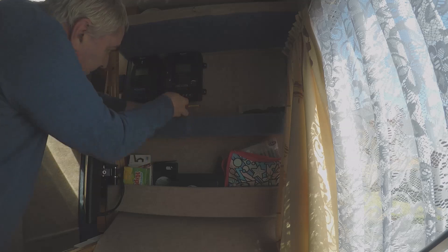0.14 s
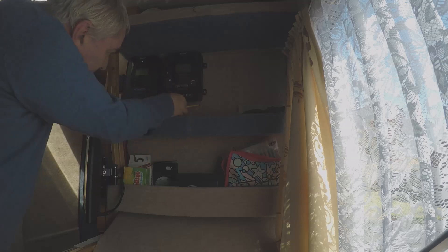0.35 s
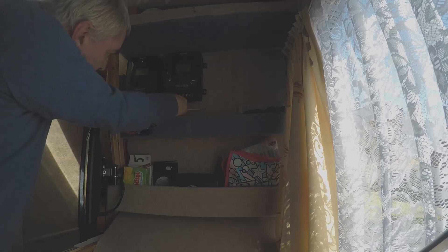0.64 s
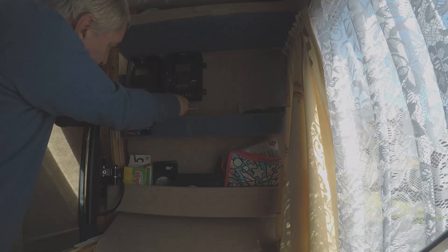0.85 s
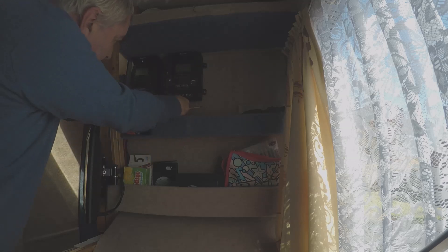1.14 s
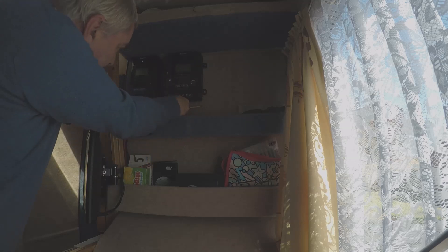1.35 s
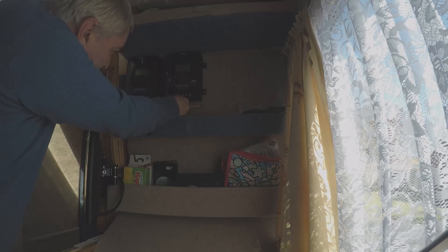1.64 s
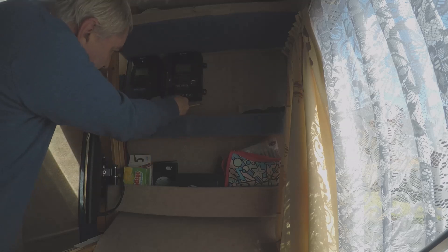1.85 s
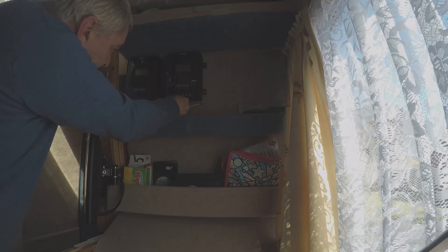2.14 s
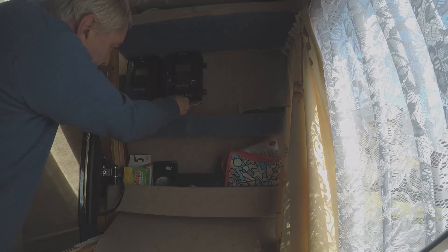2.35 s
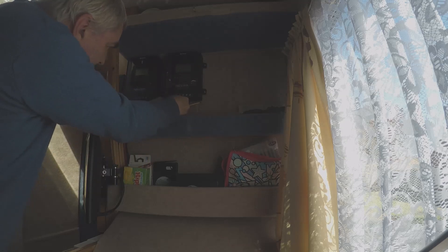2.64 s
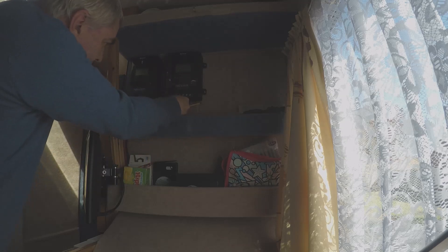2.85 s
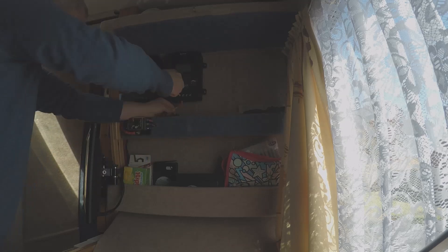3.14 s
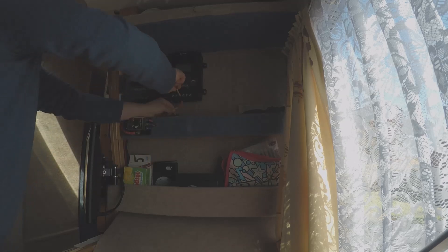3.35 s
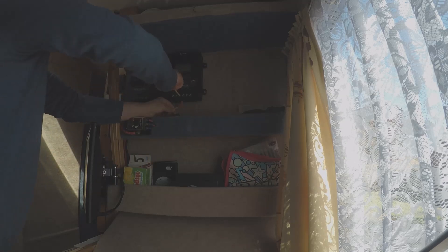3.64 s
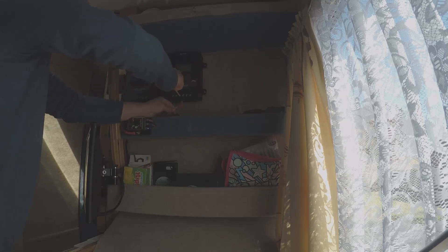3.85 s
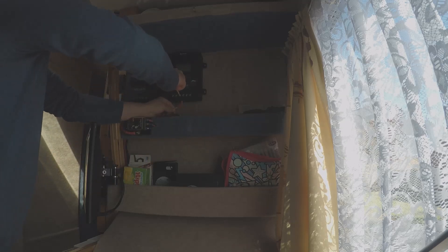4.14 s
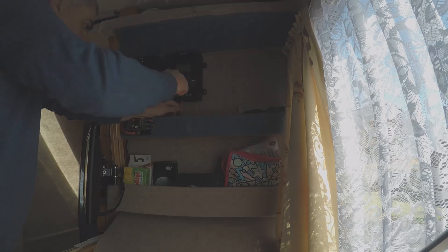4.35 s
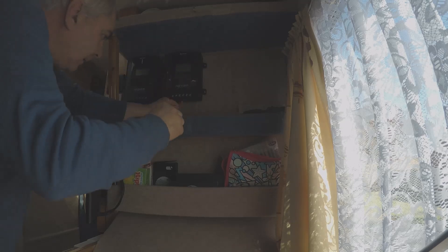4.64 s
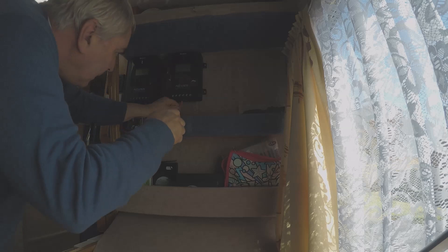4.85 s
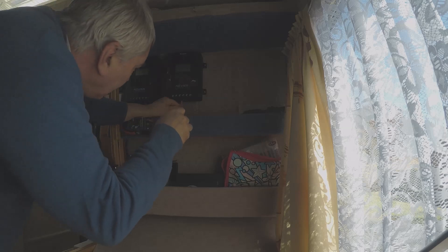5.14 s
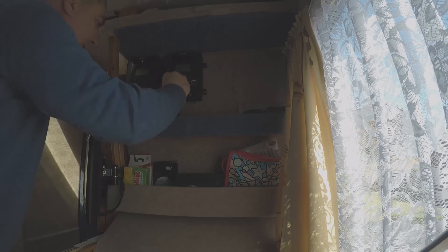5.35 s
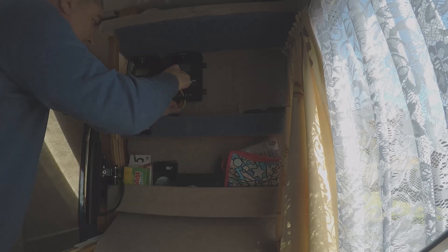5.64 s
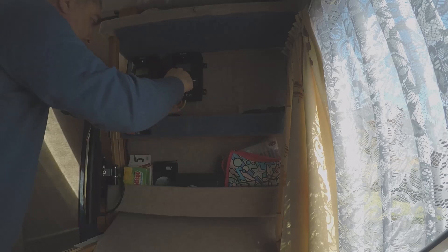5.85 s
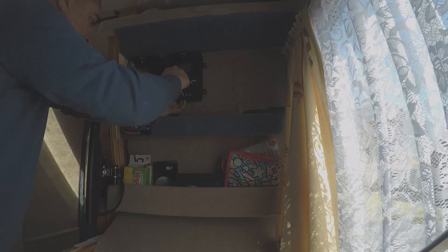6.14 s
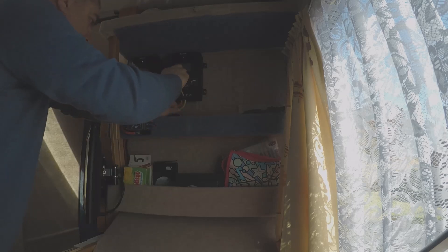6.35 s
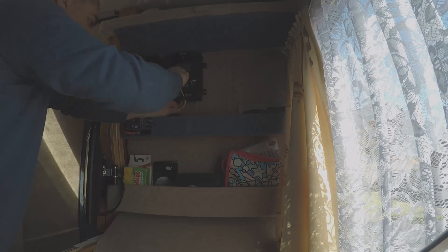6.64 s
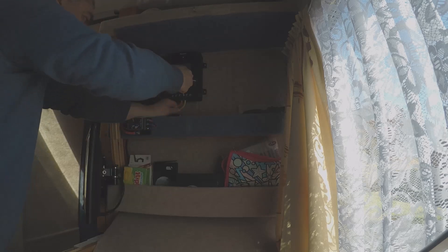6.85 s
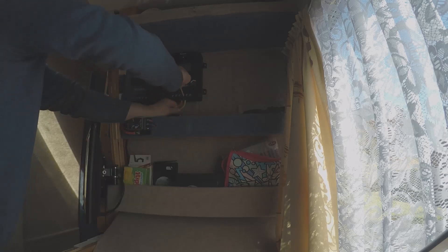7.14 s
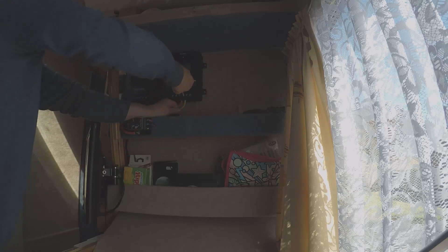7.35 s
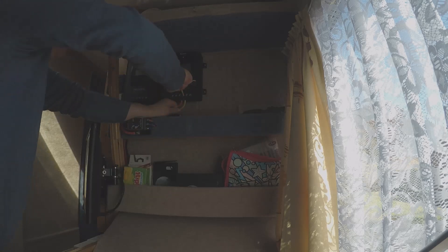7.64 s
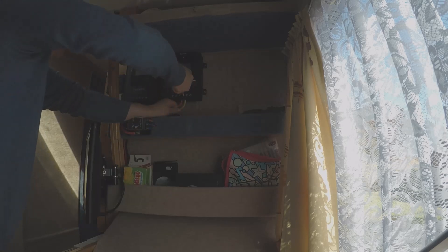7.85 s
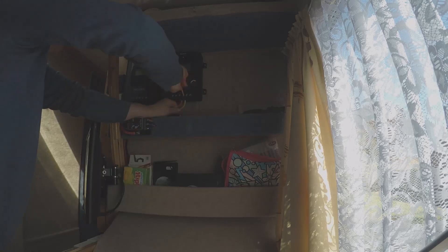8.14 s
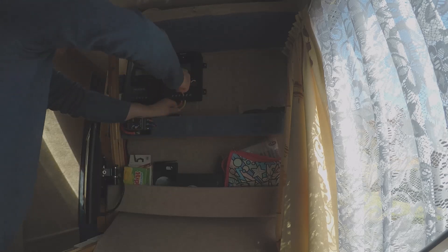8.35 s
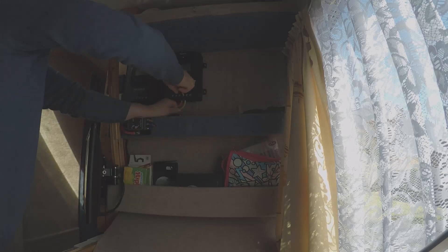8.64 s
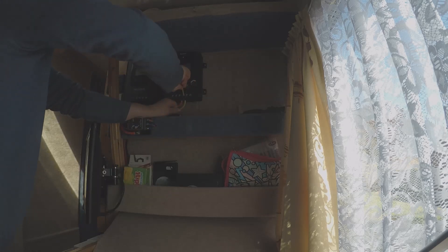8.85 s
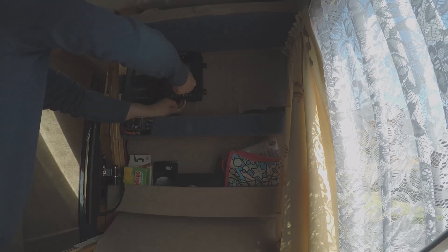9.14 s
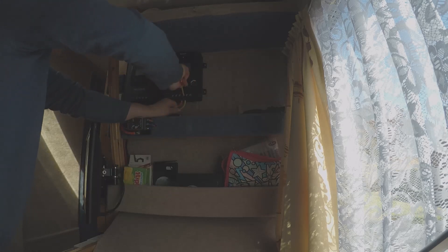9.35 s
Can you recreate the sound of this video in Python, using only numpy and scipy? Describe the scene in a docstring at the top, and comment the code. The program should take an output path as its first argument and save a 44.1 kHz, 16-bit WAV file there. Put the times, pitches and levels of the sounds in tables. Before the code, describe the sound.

Irregular screwdriver clicks and knocks on wall terminals in a van, with sleeve rustle and dull thumps over a low rumble.

```python
"""Wiring work in a parked van.

A screwdriver strikes and drags on terminals: the steel blade snaps, the housing clacks, the panel knocks.
Wires rasp over the housing, sleeves rub, and shifting weight thumps, judders and rocks the body.
The small upholstered cabin damps each sound at once, over a steady rumble and hiss."""
import sys
import numpy as np
from scipy import signal
from scipy.fft import rfft, irfft, next_fast_len
from scipy.io import wavfile

SR = 44100
rng = np.random.default_rng(int(sys.argv[2]) if len(sys.argv) > 2 else 0)


def persist_wave(psi):
    """Save psi, clipped to +-1, as 16-bit WAV."""
    counts = np.round(np.clip(psi, -1, 1) * 32767).astype(np.int16)
    wavfile.write(sys.argv[1], SR, np.atleast_2d(counts).T)


N = 419391

# rocking of the van: time_s, level_db
SWAY_LEVELS = [(0, -33), (.6, -20), (2.2, -20), (2.85, -17.5), (3.4, -23.5), (6.5, -26.5), (9.5, -24.5)]
# its pressure swings: freq_hz, gain_db
SWAY_SPECTRUM = [(5, -1), (14, 11.5), (30, -4), (150, -66)]
# steady rumble and hiss: freq_hz, gain_db
HISS_SPECTRUM = [(30, -39.5), (56, 3.5), (130, -8.5), (250, -22), (1000, -24), (4000, -30.5), (15000, -38)]
# sleeve slides: start_s, length_s, rub_db, swish_db
SLEEVE_STROKES = [(0.261, 0.104, -32, -47.5), (0.448, 0.064, -37, -50), (0.623, .14, -37, -42.5),
                  (1.037, 0.155, -32, -43.5), (1.448, 0.088, -37.5, -43), (1.706, 0.056, -32, -45),
                  (2.481, 0.034, -29.5, -56), (3.961, 0.0844, -34.5, -72.5)]
# dull cloth rub: freq_hz, gain_db
RUB_SPECTRUM = [(50, 7.5), (130, 12.5), (500, -3.5), (1450, -12), (2200, -18.5), (14000, -39)]
# bright cloth swish: freq_hz, gain_db
SWISH_SPECTRUM = [(500, 14.5), (1300, 10.5), (2200, -2.5), (4600, 0.5), (4800, 6), (5000, -6.5),
                  (14000, -16)]
# wire pulled along the housing: start_s, length_s, attack_s, level_db
WIRE_PULLS = [(0.18, 0.0556, 0.0028, -39), (0.261, 0.091, 0.0031, -36.5), (2.854, 0.1332, 0.037, -37),
              (2.982, 0.024, 0.0108, -33)]
# wire rasp: freq_hz, gain_db
WIRE_SPECTRUM = [(400, 6), (1400, 2.5), (2000, -4.5), (9000, -9.5), (10500, -17), (15000, -23)]
# feet and arms bump floor and furniture: start_s, peak_db, centre_hz
BUMPS = [(.182, -14, 161.6), (0.221, -17, 240), (.271, -7, 83.8), (1.539, -19, 223), (1.749, -20, 85.6),
         (2.52, -14.5, 114.2), (2.805, -12.5, 85.8), (3.146, -15, 88), (3.278, -21.5, 126),
         (3.458, -21, 171.3), (3.647, -24, 139), (4.053, -24, 163.6), (4.25, -21.5, 100.6),
         (5.263, -21.5, 119), (5.319, -14, 253), (5.33, -19, 75), (7.655, -23, 129), (8.764, -16.5, 140.3)]
# floor and cabin air: pitch_hz, t60_s, gain_db
BODY_MODES = [(46.14, 1, -2), (69.06, 0.52, 3.5), (87.53, 0.42, -4.5), (115.92, 0.381, -2),
              (139, 0.2067, 1.5), (194.46, 0.0883, 1.5), (223.2, 0.1764, -0.5)]
# tool nudges or grates on the panel: start_s, drag_s, knock_db, clack_db
TOOL_SCRAPES = [(.183, 0.0092, -39, -33), (.808, .004, -44.5, -41), (1.167, 0.0089, -38.5, -35.5),
                (1.362, 0.02806, -26.5, -32), (1.576, 0.00865, -39, -44), (1.836, 0.0188, -32, -39.5),
                (2.186, .006, -40.5, -44.5), (3.255, .008, -36, -44), (3.276, .018, -29, -45),
                (3.355, 0.01, -33, -44.5), (3.424, 0.0044, -43, -51.5), (3.459, 0.0045, -38, -48),
                (4.261, 0.00545, -29, -40), (5.47, 0.0527, -34.5, -35), (5.788, 0.0219, -30, -34.5),
                (6.408, 0.0195, -33.5, -37.5), (6.648, .011, -33.5, -35), (7.387, 0.0574, -31.5, -40.5),
                (8.008, 0.0192, -27, -35), (8.043, 0.01183, -28.5, -45.5), (8.108, 0.00814, -28.5, -36.5),
                (8.176, 0.00186, -31.5, -42.5), (8.232, 0.00727, -30.5, -32), (8.591, 0.0046, -38, -38.5),
                (8.624, .014, -22.5, -33), (8.657, 0.0081, -32.5, -55), (9.352, .008, -41, -37.5),
                (9.374, 0.01377, -29.5, -35.5)]
# tip strikes a terminal: start_s, drag_s, knock_db, clack_db, tick_db, snap_db, pitch_hz
TOOL_TAPS = [(1.1241, 0.0016, -30.5, -28.5, -26, -42, 3040), (1.5405, 0, -32, -30, -35, -48.5, 908.6),
             (1.641, .008, -38.5, -39, -47, -62.5, 840), (2.798, 0.0027, -40.5, -35, -48.5, -42, 998),
             (3.145, 0.0041, -58.5, -40.5, -45.5, -49.5, 1318), (4.2305, .005, -39, -29, -27, -38.5, 3950),
             (4.2395, .003, -31, -26, -27.5, -41.5, 982), (5.313, .007, -25, -22.5, -34.5, -39.5, 1450),
             (5.323, 0.0098, -20, -22, -33.5, -45.5, 1400), (5.682, 0, -45.5, -40.5, -37, -51.5, 3454),
             (5.773, .007, -43.5, -35, -37.5, -48, 3350), (5.8737, 0.0052, -22, -21, -35.5, -43, 978),
             (5.929, 0.0057, -38.5, -35.5, -31, -49.5, 2500), (6.0895, .004, -45, -32, -28.5, -44, 4530),
             (6.124, .01, -28.5, -27.5, -35.5, -58.5, 1260), (6.37, 0.0069, -39.5, -47.5, -38, -53, 3395),
             (6.5315, 0.00235, -22.5, -20, -30.5, -50, 793.4),
             (6.7774, 0.0064, -26.5, -23.5, -26, -30.5, 982), (6.959, .0081, -22.5, -24, -38, -60, 796),
             (7.0697, 0.00394, -15.5, -16.5, -32.5, -55, 1538), (7.5267, 0.0052, -23, -20.5, -31, -38, 782),
             (7.658, 0.0109, -37.5, -41, -39.5, -46.5, 2160),
             (8.2025, 0.0036, -24, -21.5, -32.5, -38.5, 549), (8.7654, .0039, -12, -20, -21.5, -32, 2453)]
# wall panel and fittings: pitch_hz, width_hz, gain_db
PANEL_MODES = [(390.4, 68.3, -0.5), (482.3, 67.6, 4.5), (795.2, 68, -4.5), (997.7, 56, -9),
               (1276.6, 132.5, 1), (1515, 113, -1), (2464, 104, -3.5), (3254, 254, 0.5)]
# dense overtones of the fittings: freq_hz, gain_db
SCATTER_SPECTRUM = [(200, -11.5), (450, 5.5), (1600, -0.5), (3200, -2.5), (6000, -9), (15000, -32)]
# cabin decay: freq_hz, t60_s
CABIN_DECAY = [(250, 0.1656), (700, 0.0638), (1800, 0.0511), (5000, 0.0443), (13000, 0.04)]
# slow slide against the furniture: start_s, length_s, level_db
LEAN_SLIDE = (2.223, 0.1144, -21)
# furniture judder: pitch_hz, width_hz, gain_db
FURNITURE_MODES = [(133.2, 40, -3.5), (180.6, 17, -1), (409, 28, -12)]
HOUSING_HZ, HOUSING_WIDTH_HZ = [490, 780, 1360, 2150, 2930, 5750, 8800], 85


def amp(db):
    """Decibels to gain."""
    return 10 ** (np.asarray(db) / 20)


def unit(x):
    """Scale to rms 1."""
    return x / np.sqrt(np.mean(x ** 2) + 1e-20)


def along(points, hz):
    """Interpolate (freq_hz, value) rows on a log axis."""
    freqs_hz, values = np.transpose(points)
    return np.interp(np.log(hz + 1), np.log(freqs_hz + 1), values)


def wobble(knots_per_s):
    """Wandering random curve."""
    knots = rng.standard_normal(int(N * knots_per_s / SR) + 2)
    return np.interp(np.arange(N) * knots_per_s / SR, np.arange(len(knots)), knots)


def colour(x, spectrum):
    """Filter x by a spectrum; rms 1."""
    size = next_fast_len(len(x))
    gain = amp(along(spectrum, np.fft.rfftfreq(size, 1 / SR)))
    return unit(irfft(rfft(x, size) * gain, size)[:len(x)])


def band(x, lo_hz, hi_hz):
    """Causal band-pass."""
    return signal.sosfilt(signal.butter(3, [lo_hz, hi_hz], "band", fs=SR, output="sos"), x)


def resonate(x, modes):
    """Drive (pitch_hz, width_hz, gain_db) modes with x."""
    return sum(amp(db) * signal.lfilter(*signal.iirpeak(hz, hz / width_hz, SR), x)
               for hz, width_hz, db in modes)


def add(track, start_s, sound):
    """Mix a sound in at start_s."""
    part = track[max(0, round(start_s * SR)):][:len(sound)]
    part += sound[:len(part)]


def sway():
    """Slow pressure swings of the rocking van."""
    level_db = np.interp(np.arange(N) / SR, *np.transpose(SWAY_LEVELS))
    return amp(level_db) * colour(rng.standard_normal(N), SWAY_SPECTRUM)


def rumble_and_hiss(level_db=-42):
    """Steady noise, strongest in the bass."""
    return amp(level_db) * colour(rng.standard_normal(N), HISS_SPECTRUM)


def stroke(start_s, length_s, attack_s=0.0153, release_s=0.061):
    """Speed through one movement: attack, hold, release."""
    age_s = np.arange(N, dtype="float32") / SR - start_s
    return np.clip(age_s / attack_s, 0, 1) * np.exp(-np.clip((age_s - length_s) / release_s, 0, 20))


def friction(spectrum, grain_db, pressure_db=1.5):
    """A surface catches and slips in tiny grains under uneven pressure."""
    grains = rng.standard_normal(N) * amp(grain_db * wobble(700) + pressure_db * wobble(55))
    return colour(grains, spectrum)


def housed(x, direct_gain=0.57):
    """Rubbing heard through the hollow housing; rms 1."""
    return unit(direct_gain * x + resonate(x, [(hz, HOUSING_WIDTH_HZ, 0) for hz in HOUSING_HZ]))


def arm_motion(fidget_db=-47, swing_db=5.5, reach_db=-42, reach_s=0.0942, lead_s=0.0484):
    """Rub and swish gains: constant fidgeting, strokes, and a reach for each tap or scrape."""
    rub_power = amp(fidget_db + swing_db * wobble(knots_per_s=6.4)) ** 2
    swish_power = np.zeros(N)
    for start_s, length_s, rub_db, swish_db in SLEEVE_STROKES:
        speed = stroke(start_s, length_s)
        rub_power += (amp(rub_db) * speed) ** 2
        swish_power += (amp(swish_db) * speed) ** 2
    reach_power = (amp(reach_db) * stroke(0, reach_s)[:SR]) ** 2
    for start_s, *_ in list(TOOL_TAPS) + list(TOOL_SCRAPES):
        add(rub_power, start_s - lead_s, reach_power)
    return np.sqrt(rub_power), np.sqrt(swish_power)


def sleeves(resonance=0.189):
    """Dull rub and bright swish of cloth; both ring the panel."""
    rub_gain, swish_gain = arm_motion()
    rub = rub_gain * friction(RUB_SPECTRUM, grain_db=3.5)
    swish = swish_gain * housed(friction(SWISH_SPECTRUM, grain_db=0.5))
    cloth = rub + swish
    return (cloth + resonance * resonate(cloth, PANEL_MODES)) / np.sqrt(1 + resonance)


def wires():
    """A wire rasps over the housing edge and stops short as the pull ends."""
    speed = sum(amp(db) * stroke(start_s, length_s, attack_s, release_s=0.008)
                for start_s, length_s, attack_s, db in WIRE_PULLS)
    return speed * housed(friction(WIRE_SPECTRUM, grain_db=2.5, pressure_db=2.42))


def boom(centre_hz, spread_oct, damping=1, rise_s=0.00387):
    """A soft blow rings the van's low modes near centre_hz; peak 1."""
    t = np.arange(SR // 2, dtype="float32") / SR
    sound = np.zeros_like(t)
    for hz, t60_s, db in BODY_MODES:
        share = amp(db) * np.exp(-.5 * (np.log2(hz / centre_hz) / spread_oct) ** 2)
        age_s = t[:int(t60_s * SR)]
        cycles = hz * rng.normal(1, 0.0384) * age_s + rng.random()
        add(sound, 0, share * amp(-60 * damping * age_s / t60_s) * np.sin(2 * np.pi * cycles))
    sound *= 1 - np.exp(-(t / rise_s) ** 2)
    return sound / np.abs(sound).max()


def thumps():
    """Weight shifts on the floor and against the furniture."""
    out = np.zeros(N)
    for start_s, peak_db, centre_hz in BUMPS:
        add(out, start_s, amp(peak_db) * boom(centre_hz, spread_oct=0.672))
    return out


def contacts(brushes_per_s=2.2, brush_s=0.0065, brush_db=-52, soft_db=5, tick_rel_db=-14, snap_rel_db=-28):
    """Taps, scrapes and chance brushes; the blunt ones barely excite terminal and blade."""
    draws = rng.random((int(brushes_per_s * N / SR), 2))
    brushes = [(when * N / SR, brush_s, brush_db, brush_db - soft_db * soft) for when, soft in draws]
    blunt = [(start_s, drag_s, knock_db, clack_db, clack_db + tick_rel_db, clack_db + snap_rel_db)
             for start_s, drag_s, knock_db, clack_db in list(TOOL_SCRAPES) + brushes]
    return list(TOOL_TAPS) + blunt


def panel_ring(t, pitches_hz, part_q=13.55, part_db=4, scatter_db=-1.5, hold_s=0.00293):
    """Panel and struck part ring at random strengths, in a spray of near-wall reflections."""
    part_modes = [(hz, hz / part_q, part_db) for hz in pitches_hz]
    modes = np.zeros(len(t))
    for hz, width_hz, db in list(PANEL_MODES) + part_modes:
        envelope = amp(db + rng.normal(0, 2)) * np.exp(-np.pi * width_hz * t)
        modes += envelope * np.sin(2 * np.pi * (hz * t + rng.random()))
    overtones = colour(rng.standard_normal(len(t)), SCATTER_SPECTRUM)
    bins_hz, age_s, frames = signal.stft(overtones, SR, nperseg=128)
    fade = amp(-60 * np.maximum(age_s - hold_s, 0) / along(CABIN_DECAY, bins_hz)[:, None])
    spray = signal.istft(frames * fade, SR, nperseg=128)[1][:len(t)]
    return unit(modes) + amp(scatter_db) * unit(spray)


def slips(drag_s, slips_per_s=1200):
    """Contact force: one catch, then small slips while the tip drags."""
    force = np.zeros(int(drag_s * SR) + 1)
    count = int(drag_s * slips_per_s)
    force[rng.integers(0, len(force), count)] = rng.normal(0, 0.261, count)
    force[0] = 1
    return force


def screwdriver(knock_rise_s=0.00247, clack_rise_s=0.00133, wall_rel_db=-1):
    """Blade and terminal sound first; the heavier housing and panel follow, and the wall booms."""
    out = np.zeros(N)
    t = np.arange(SR // 7) / SR
    span_samples = SR / 50  # band levels: rms over 20 ms
    early = np.exp(-t / clack_rise_s)  # only the tip moves
    for start_s, drag_s, knock_db, clack_db, tick_db, snap_db, *pitches_hz in contacts():
        ring = panel_ring(t, pitches_hz)
        force = slips(drag_s)
        panel = band(ring * (1 - np.exp(-t / knock_rise_s)), 177.5, 685)
        housing = band(ring * (1 - early), 769, 1686)
        terminal = band(ring * (1 + 0.174 * early), 2076, 4935)
        blade = band(ring * (1 + 1.55 * early), 6580, 13000)
        for db, part in (knock_db, panel), (clack_db, housing), (tick_db, terminal), (snap_db, blade):
            sound = signal.fftconvolve(part, force)
            add(out, start_s, amp(db) * sound * np.sqrt(span_samples / np.sum(sound ** 2)))
        wall = boom(centre_hz=133.3, spread_oct=0.735, damping=1.2)  # damped by the hand on it
        add(out, start_s, amp(knock_db + wall_rel_db) * wall)
    return out


def lean(scuff_rel_db=-22):
    """Weight slides against the furniture, which judders with a muffled drone."""
    start_s, length_s, level_db = LEAN_SLIDE
    speed = stroke(start_s, length_s, attack_s=0.092, release_s=0.01575)
    judder = unit(band(resonate(rng.standard_normal(N), FURNITURE_MODES), 94, 364))
    scuff = amp(scuff_rel_db) * housed(friction(SWISH_SPECTRUM, grain_db=3.0))
    return amp(level_db) * np.sqrt(speed) * (judder + scuff)


def scene():
    """Mono sum of all sources."""
    return (screwdriver() + thumps() + lean() + wires() + sleeves() + sway() + rumble_and_hiss())[None]


def record(dry):
    """Clip the highest peaks, then cut the top treble."""
    ceiling, top_hz = 0.9, 15600
    size = next_fast_len(N + SR // 2)
    clipped = np.clip(dry, -ceiling, ceiling)
    passband = np.fft.rfftfreq(size, 1 / SR) < top_hz
    return irfft(rfft(clipped, size) * passband, size)[:, :N]


dry = scene()
out = record(dry)
persist_wave(out)
```